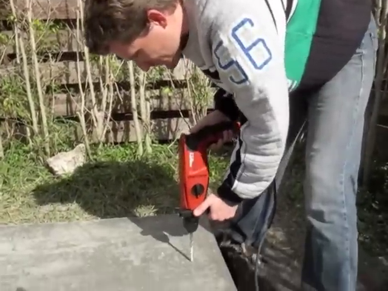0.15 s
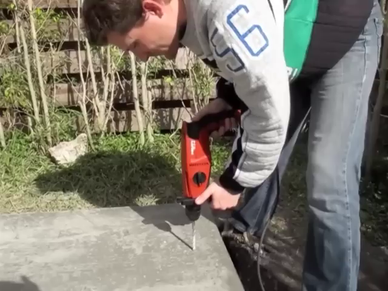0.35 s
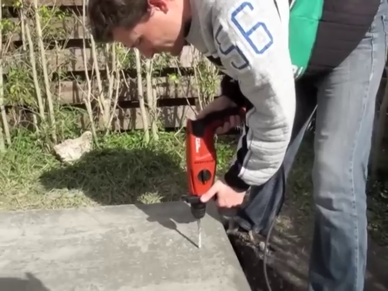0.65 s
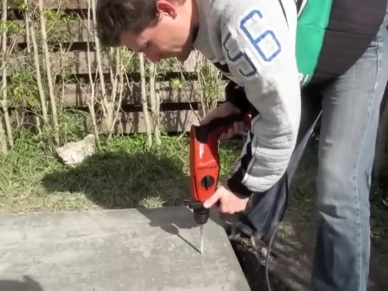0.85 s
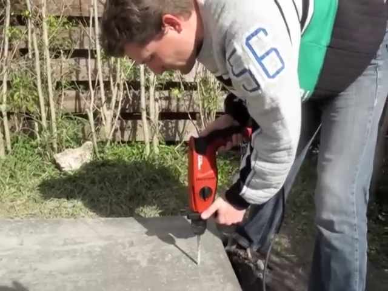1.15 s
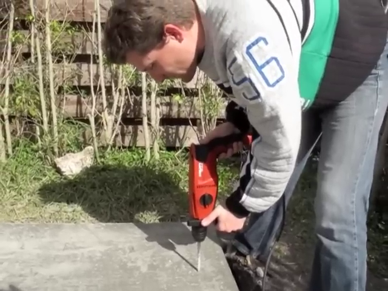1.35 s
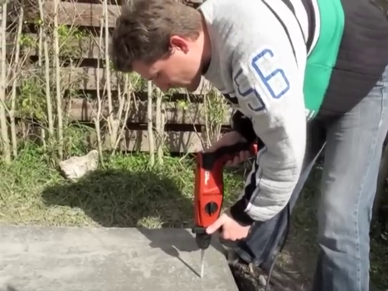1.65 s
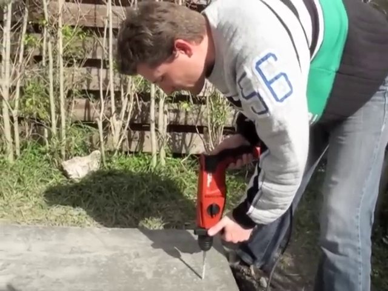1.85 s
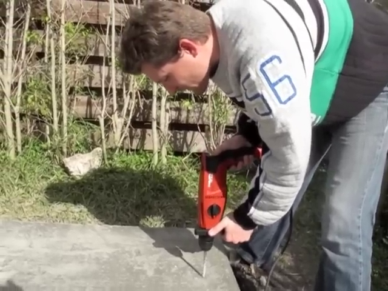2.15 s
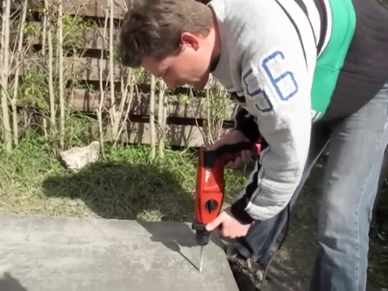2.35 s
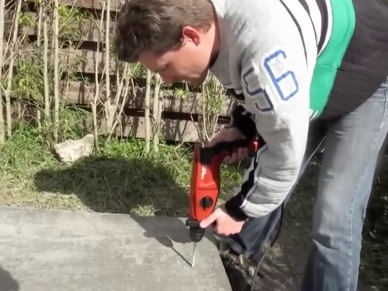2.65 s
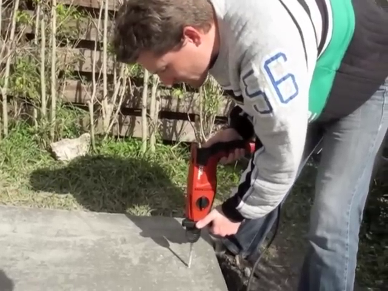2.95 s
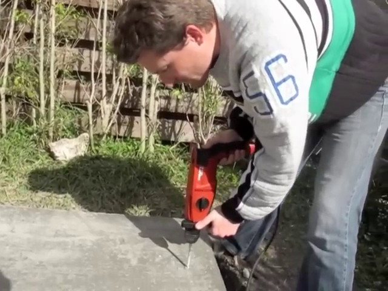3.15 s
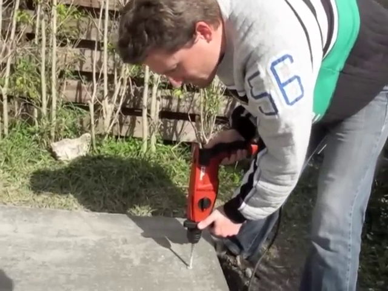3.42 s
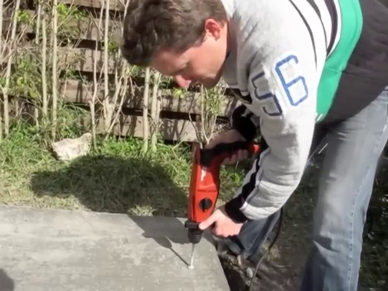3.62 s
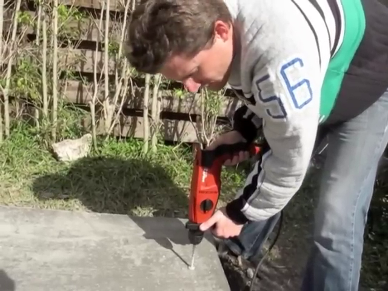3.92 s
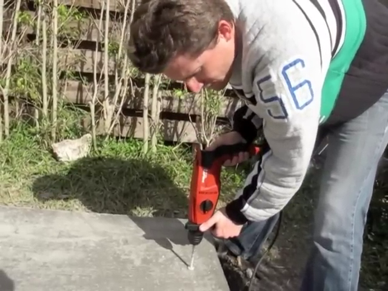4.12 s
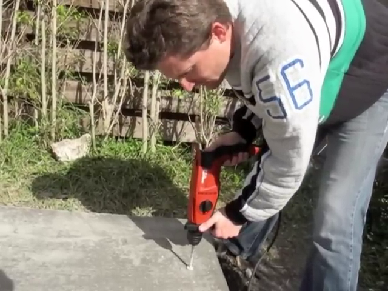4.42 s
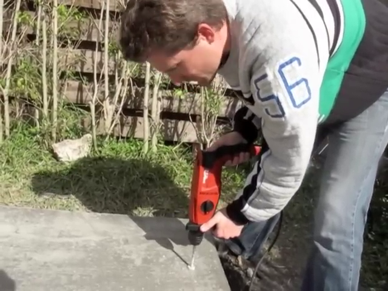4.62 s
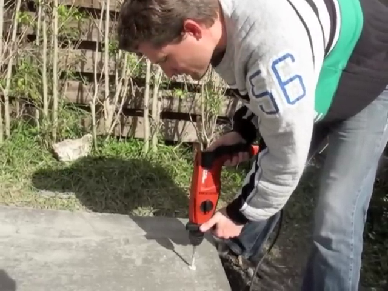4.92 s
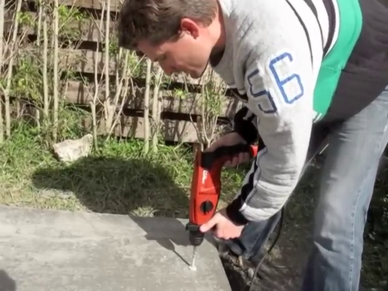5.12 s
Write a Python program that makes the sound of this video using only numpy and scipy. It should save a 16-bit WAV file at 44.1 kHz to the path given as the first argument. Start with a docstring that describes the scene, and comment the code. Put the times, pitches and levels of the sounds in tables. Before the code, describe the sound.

Electric hammer drill winds up with gear rattle and whine, sags briefly, then pounds concrete in a fast, harsh buzzing clatter.

```python
"""A rotary hammer starts on a concrete slab: one turning crank times its blows, gear rattle and whine.
First the trigger clicks and the gears wind up; then the bit is pressed home and the striker engages.
The motor sags once, picks up and hammers on at about fifty blows a second, with a few low overload thumps.
Short bursts of noise and struck resonances make the blows; sine waves make the whine.
Behind it, shaped noise gives a distant garden rush and soft puffs of wind on the microphone."""
import sys
import numpy as np
from scipy import signal
from scipy.fft import rfft, irfft
from scipy.io import wavfile
from scipy.ndimage import uniform_filter1d, minimum_filter1d

SR = 44100
rng = np.random.default_rng(int(sys.argv[2]) if len(sys.argv) > 2 else 0)


def generate_wav(sig):
    """Save sig (samples, or channels by samples) to the path in sys.argv[1] as 16-bit PCM at SR."""
    pcm = np.round(np.clip(np.atleast_2d(sig).T, -1, 1) * 32767).astype(np.int16)
    wavfile.write(sys.argv[1], SR, pcm)


N = 232838
T = np.arange(N) / SR  # time in seconds
TEETH = 31  # gear teeth passing in one crank turn

# The running gears, before the effect of speed: [t/s, level/dB]
GEAR_LEVEL = [(0.9, -13.5), (1.7, -16.5), (2.05, -17), (2.15, -20), (2.45, -18.5), (2.64, -13),
              (2.92, -22.5), (4.4, -21), (4.87, -17.5), (5.28, -18.5)]
# How hard the bit is pressed home, as strength of the blows: [t/s, level/dB]
FEED = [(2.1, -19), (2.3, -22), (2.47, -16), (2.6, -15), (2.72, -17), (2.95, -19), (3.3, -15), (3.7, -14),
        (4.35, -15), (4.9, -20), (5.25, -16)]
SEAT_S, SEATING_S = 2.69, 1  # the bit starts to seat in its hole, and takes this long
LOOSE_RING_DB, SEATED_RING_DB = -8.25, -22.75  # a loose bit rings more brightly
RING_FROM_TURNS_PER_S, RING_FULL_TURNS_PER_S = 18, 33  # slow strokes are too soft to ring it
FULL_RATTLE_TURNS_PER_S, RATTLE_POWER = 18.5, 1.7  # below this speed the gears grow quiet


def drill():
    """Crank angle times everything: gears rattle and whine as they gain speed, blows follow the feed."""
    turns, speed, pull = motor()
    seated = np.clip((T - SEAT_S) / SEATING_S, 0, 1)

    blow, ring = hammer(turns)
    ringing = undb(LOOSE_RING_DB * (1 - seated) + SEATED_RING_DB * seated)
    ringing *= np.interp(speed, [RING_FROM_TURNS_PER_S, RING_FULL_TURNS_PER_S], [0, 1])
    blows = undb(curves(FEED)[0]) * (blow + ringing * ring)

    running = undb(curves(GEAR_LEVEL)[0])
    running *= np.tanh(speed / FULL_RATTLE_TURNS_PER_S) ** RATTLE_POWER
    gearbox = gears(turns, speed) + whine(turns, speed, pull, seated)
    return blows + running * gearbox


# Contacts in one stroke, the blow and then two rebounds: [angle/turns, level/dB, scatter/turns]
# (rebound_db is added to the rebounds)
STROKE = [(-.04, 14.5, .005), (0.163, 1.5, .012), (0.543, -0.5, .025)]
# Tone of the cracking concrete: [f/Hz, level/dB]
CRACK = [(100, -51), (270, -30), (470, -32), (640, -1.5), (950, -10), (1500, 5), (2500, 8.5), (3400, 5),
         (4600, -4.5), (7000, -1.5), (10400, -2.5), (11800, -23.5), (15500, -33)]
# Resonances of the struck bit and chuck: [f/Hz, width/Hz, level/dB]
BIT = [(1250, 260, -1), (2325, 280, -2), (2710, 1140, -5.5), (3990, 150, -2), (5080, 130, 4)]
# Resonances of the slab and housing shaken by each blow: [f/Hz, width/Hz, level/dB]
BODY = [(420, 98, -12.5), (603, 44, -7), (852, 51, 3.5), (1150, 56, -15), (1190, 177, 8), (1530, 200, 4.5)]
# Tone of the bright ring: [f/Hz, level/dB]
RING = [(3000, -74), (9000, -8), (10600, 13.5), (11800, -10), (12800, -1), (14200, -4), (14800, 7),
        (15600, -8)]


def hammer(turns, rebound_db=1, scatter_db=1.03, crack_s=0.0013, rise_s=0.00085, ring_s=0.00057,
           dust_s=0.0037, dust=0.028, bit_db=1.0, body_db=-9):
    """The striker hits once a turn, the bit rebounds twice: steel rings, concrete cracks.

    Returns the blow and the bright ring."""
    stroke = np.arange(int(turns[-1]) + 2)
    hits = []
    for angle, db, scatter in STROKE:
        chance = rng.standard_normal((len(stroke), 2))
        at = stroke + angle + scatter * chance[:, 0]
        hits.append(contacts(turns, at, undb(db + scatter_db * chance[:, 1])))
    blows = hits[0] + undb(rebound_db) * sum(hits[1:])

    # two fades in a row give each crack a short rise and a tail
    crack_level = fade(fade(blows, rise_s), crack_s)
    crack = unit(colour(crack_level * rng.standard_normal(N), CRACK))

    # the steel chatters briefly against the stone
    chatter = fade(blows, 0.0016) * rng.choice([-1, 1], N)
    struck = unit(blows) + 1.6 * unit(chatter)
    # passing the bit and chuck in turn makes the ring swell before it fades
    bit = resonate(resonate(struck, BIT), [(2630, 1040, 0)])
    body = band(resonate(blows, BODY), 401, 2400)
    blow = unit(crack + undb(bit_db) * unit(bit) + undb(body_db) * unit(body))

    # a bright ping on each contact, then a faint fizz of crushed stone
    ring_level = fade(blows, ring_s) + dust * fade(blows, dust_s)
    ring = unit(colour(ring_level * rng.standard_normal(N), RING))

    # allow for the silent time before the striker engages
    busy = np.sqrt(np.mean(turns > 0))
    return busy * blow, busy * ring


# Tooth mesh partials, from the first multiple up:
# [level/dB between case resonances at 2 kHz, level/dB on the strongest resonance]
MESH = [(-12.5, -15), (-15.5, -3), (-25, -10.5)]
UPPER_MESH_DB = -6  # multiples 4 to 10, on the strongest resonance
SEATED_WHINE_DB = -32  # added to multiples 4 to 10 as the bit seats and damps them
PULL_DB = 2.5  # added to the lower multiples at full pull, taken off when fully coasting
IDLE_SURGE, PULL_SURGE = .12, 0.64  # surge depth, and what full pull adds to it
MAINS_HZ, MAINS_PEAK_S = 60, 1.638  # surge rate, and the time of one surge peak
BACKLASH = .026  # play between the teeth, in tooth steps (rms)
SINGS_FROM_TURNS_PER_S = 18.2  # slower teeth only rattle


def whine(turns, speed, pull, seated, throb=0.23, flutter_db=2.2, surge_sharpness=1.5):
    """The tooth mesh sings; partials swell in passing case resonances and all surge with the mains."""
    # play between the teeth roughens the tone
    mesh = TEETH * turns + BACKLASH * walk(200)

    # pulling up to speed deepens the surge; its average power stays level
    surge = IDLE_SURGE + PULL_SURGE * np.maximum(pull, 0)
    mains = np.cos(2 * np.pi * MAINS_HZ * (T - MAINS_PEAK_S))
    feed = np.exp(surge_sharpness * surge * mains)
    feed /= np.sqrt(uniform_filter1d(feed ** 2, SR // MAINS_HZ))

    tone = 0
    for k in range(1, 11):
        pitch = k * TEETH * speed
        resonant = np.sqrt(case_response(pitch))
        if k <= len(MESH):
            between_db, resonant_db = MESH[k - 1]
            # between its resonances the small case radiates high tones better than low ones
            between = np.minimum(pitch / 2000, 1.6) ** 1.5
            gain = np.hypot(undb(between_db) * between, undb(resonant_db) * resonant)
            gain = gain * undb(PULL_DB * pull)
        else:
            gain = undb(UPPER_MESH_DB + SEATED_WHINE_DB * seated) * resonant
        partial = undb(flutter_db * walk(140)) * np.sin(2 * np.pi * k * mesh)
        tone = tone + gain * unit(partial)

    singing = np.tanh((speed / SINGS_FROM_TURNS_PER_S) ** 4)
    once_a_turn = 1 + throb * np.cos(2 * np.pi * turns)
    return tone * singing * feed * once_a_turn


# Tone of the gear rattle: [f/Hz, level/dB]
RATTLE = [(100, -63), (270, -30.5), (470, -22), (580, -3), (900, -0.5), (1170, 6.5), (1600, -4),
          (2400, 3.5), (4900, -4), (6400, -11.5), (8900, -3), (10600, -11.5), (11700, -37), (13000, -38)]
# Resonances of the gear case, also heard by the whine: [f/Hz, width/Hz, level/dB]
CASE = [(764, 115, 5), (1218, 96, 9), (2320, 202, 13.5), (3645, 470, 8), (4120, 150, 9), (4830, 160, 1),
        (4970, 250, 8.5), (5750, 140, -10), (7830, 520, 2), (8980, 270, 3.5)]


def gears(turns, speed, flank_db=4, repeat_db=-3.5, knock=0.17, case_db=-3, low_hiss=0.59,
          grit_db=2.1, snap=1.02, snap_s=0.00062):
    """Worn teeth clatter alike on each turn; brushes, fan and grinding flutes add fresh noise."""
    count = 8 * TEETH
    at = np.arange(np.floor(turns[0]), turns[-1])[:, None] + rng.random(count)
    wear = rng.choice([-1, 1], count) * undb(flank_db * rng.random(count))
    clatter = unit(contacts(turns, at.ravel(), np.resize(wear, at.size)))
    # the teeth touch softly at low speed; the repeating clatter is strongest in the bass
    clatter = colour(clatter * np.tanh(speed / 15), [(1200, -0.5), (3000, -6), (8000, -11)])
    hiss = low_hiss * rng.standard_normal(N) + band(rng.standard_normal(N), 1370, 11850)

    # the piston loads the teeth several times in a turn
    piston = 1 + knock * sum(np.cos(2 * np.pi * k * turns) for k in (2, 3, 5))
    # until the striker engages, the idle piston knocks lightly at both ends of its travel
    ends = np.arange(np.floor(turns[0]), 0, .5)
    chance = rng.random((len(ends), 2))
    knocks = contacts(turns, ends + .15 * chance[:, 0], .5 + chance[:, 1])
    idle = fade(knocks, snap_s)
    # the bit catches on grit, which makes the load flicker
    grit = undb(grit_db * np.clip(walk(450), -2, 2))
    load = (piston + snap * idle) * grit

    rattle = colour((undb(repeat_db) * clatter + hiss) * load, RATTLE)
    case = band(resonate(rng.standard_normal(N) * load, CASE), 607, 8100)
    return unit(unit(rattle) + undb(case_db) * unit(case))


def case_response(pitch, reach=1.29):
    """Share of power (0-1) that the gear case radiates at this pitch in Hz."""
    top_db = max(db for _, _, db in CASE)
    power = 0
    for hz, width, db in CASE:
        power = power + undb(db - top_db) ** 2 * np.exp(-((pitch - hz) / (reach * width)) ** 2)
    return np.tanh(power)


# Trigger and feed set the speed that the motor heads for: [t/s, speed/(crank turns per second)]
DRIVE = [(0.706, 35.681), (1.331, 31.638), (1.653, 47.52), (2.007, 51.153), (2.254, 31.761), (2.468, 9.062),
         (2.572, 12.527), (2.732, 65.353), (3.087, 45.219), (3.349, 51.834), (3.884, 43.548),
         (4.265, 52.234), (4.437, 48.081), (4.438, 57.621), (4.794, 57.754), (5.257, 48.207)]
INERTIA_S = .2129  # how slowly the rotor follows
ENGAGE_S = 2.098  # the striker engages; crank angle is counted from here
PULL_TURNS_PER_S = 7.3  # speed gap that counts as a strong pull


def motor():
    """The rotor lags behind its drive.

    Returns crank angle in turns, speed in turns per second, and pull (-1 coasting to 1 pulling)."""
    drive = curves(DRIVE)[0] * (T >= DRIVE[0][0])
    speed = fade(drive, INERTIA_S) / (INERTIA_S * SR)
    turns = np.cumsum(speed) / SR
    pull = np.tanh((drive - speed) / PULL_TURNS_PER_S)
    return turns - np.interp(ENGAGE_S, T, turns), speed, pull


# Low thumps as the hardest blows overload the recorder: [t/s, level/dB]
THUMPS = [(2.736, -42), (2.79, -44), (3.273, -46), (3.415, -47), (3.825, -35.5), (3.932, -38), (4.275, -42)]
# Tone of an overload thump: [f/Hz, level/dB]
THUMP = [(25, -8), (100, -3), (300, 3), (700, -14), (2000, -40)]


def overload(decay_s=0.006):
    """A few low overload thumps at set times: bursts of low noise that die away quickly."""
    s, db = np.transpose(THUMPS)
    return fade(contacts(T, s, undb(db)), decay_s) * unit(colour(rng.standard_normal(N), THUMP))


# Snaps of the trigger and switch, before their tone is shaped: [t/s, level/dB]
CLICKS = [(.436, -35), (.684, -28.5), (0.704, -20.5)]
# Tone of the snaps: [f/Hz, level/dB]
SWITCH = [(200, -30), (700, 11.5), (2600, 6.5), (4500, -4), (7000, 1), (10500, 2.5), (11800, -29),
          (14000, -12), (16000, -18)]


def trigger(decay_s=0.0017):
    """Small plastic snaps as the switch closes: tiny fading bursts of noise."""
    s, db = np.transpose(CLICKS)
    return colour(fade(contacts(T, s, undb(db)), decay_s) * rng.standard_normal(N), SWITCH)


def yard(x, wet_db=-15, decay_s=0.045):
    """Slab, body and fence scatter a short, thin echo, made with a fading tail of noise."""
    t = T[:SR // 5]
    tail = rng.standard_normal(len(t)) * np.exp(-t / decay_s) * (t > .003)
    echo = signal.fftconvolve(x, tail / np.linalg.norm(tail))[:N]
    return x + undb(wet_db) * echo


# Tone of the distant outdoor rush: [f/Hz, level/dB]
GARDEN = [(30, -7.5), (60, -5.5), (100, -3), (170, -8), (300, -6.5), (420, 1.5), (620, 3.5), (850, 2.5),
          (1200, -0.5), (2500, -6.5), (5000, -15), (10000, -16), (11600, -28), (15000, -50)]
GARDEN_DB = -43.5  # middle level of the rush, which drifts gently around it
# Puffs of breeze on the microphone: [t/s, length/s to either side, level/dB]
GUSTS = [(4.676, .06, -61), (4.79, 0.039, -44.5), (5.113, 0.04, -45), (5.196, .03, -48)]
# Tone of the puffs: [f/Hz, level/dB]
WIND = [(20, -1), (50, -2), (120, -3), (250, -17), (600, -32)]


def garden():
    """Distant outdoor rush, and soft puffs of wind on the microphone, both from shaped noise."""
    air = unit(colour(rng.standard_normal(N), GARDEN)) * undb(GARDEN_DB + .5 * walk(3.8))
    puffs = sum(undb(db) * np.exp(-((T - s) / length) ** 2) for s, length, db in GUSTS)
    return air + puffs * unit(colour(rng.standard_normal(N), WIND))


def undb(db):
    """Decibels to gain."""
    return 10 ** (np.asarray(db) / 20)


def unit(x):
    """Scale to a standard deviation of 1."""
    return x / (np.std(x) + 1e-12)


def curves(table):
    """Each column of a timed table, joined by straight lines, at every sample."""
    s, *columns = np.transpose(table)
    return [np.interp(T, s, c) for c in columns]


def contacts(turns, at, size):
    """An impulse wherever a rising curve (crank angle or time) passes one of the given values."""
    out = np.zeros(N)
    live = (at > turns[0]) & (at < turns[-1])
    np.add.at(out, np.searchsorted(turns, at[live]), size[live])
    return out


def fade(x, seconds):
    """Exponential tail after every impulse."""
    return signal.lfilter([1], [1, -np.exp(-1 / (seconds * SR))], x)


def walk(rate):
    """Smooth chance that changes about rate times a second."""
    k = max(int(SR / rate), 1)
    steps = np.repeat(rng.standard_normal(N // k + 1), k)[:N]
    return unit(uniform_filter1d(steps, k))


def colour(x, points):
    """Filter through [f/Hz, level/dB] points; the cepstrum makes it respond only after the input."""
    size = 4096
    hz, db = np.transpose(points)
    bins_hz = np.arange(size // 2 + 1) * SR / size
    gain = undb(np.interp(np.log(bins_hz + 1), np.log(hz), db))
    cepstrum = irfft(np.log(gain))
    # folding the second half onto the first removes any response ahead of the input
    cepstrum[1:size // 2] *= 2
    cepstrum[size // 2 + 1:] = 0
    return signal.fftconvolve(x, irfft(np.exp(rfft(cepstrum))))[:N]


def resonate(x, modes):
    """Resonances side by side: [f/Hz, width/Hz, level/dB]."""
    return sum(undb(db) * signal.lfilter(*signal.iirpeak(hz, hz / width, SR), x)
               for hz, width, db in modes)


def band(x, low_hz, high_hz):
    """Steep band-pass."""
    edges = [low_hz, min(high_hz, .45 * SR)]
    return signal.sosfilt(signal.butter(6, edges, "band", fs=SR, output="sos"), x)


def scene():
    """The tool, the thumps and their echo over the garden."""
    tool = drill() + overload() + trigger()
    return (yard(tool) + garden())[None]


TOP_HZ = 15750  # the treble is cut above this


def record(dry, ceiling=0.99):
    """A fast limiter turns down any peak above the ceiling; then the top is cut."""
    size = 129  # samples that share the lowest gain, then smooth it
    gain = minimum_filter1d(np.minimum(1, ceiling / (np.abs(dry) + 1e-9)), size)
    limited = dry * uniform_filter1d(gain, size)
    return signal.sosfilt(signal.ellip(10, .2, 70, TOP_HZ, fs=SR, output="sos"), limited)


dry = scene()
out = record(dry)
generate_wav(out)
```